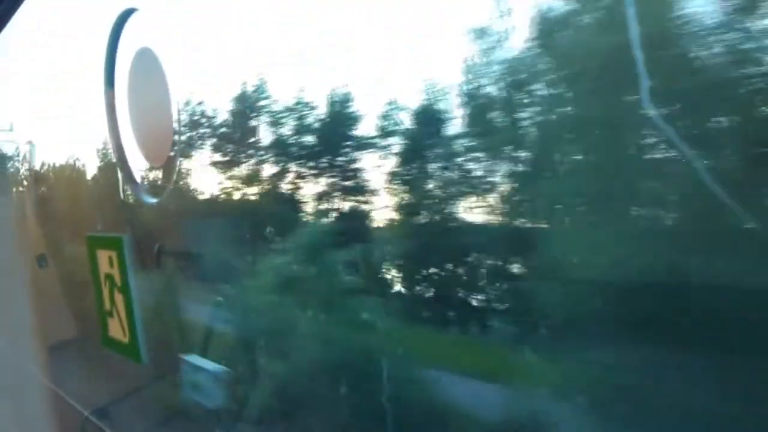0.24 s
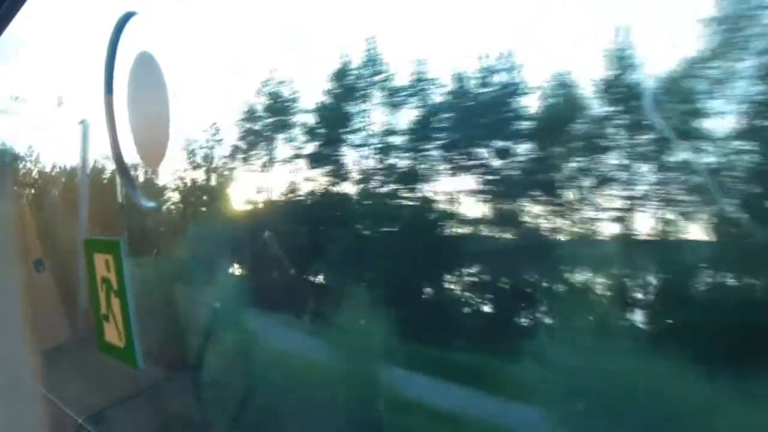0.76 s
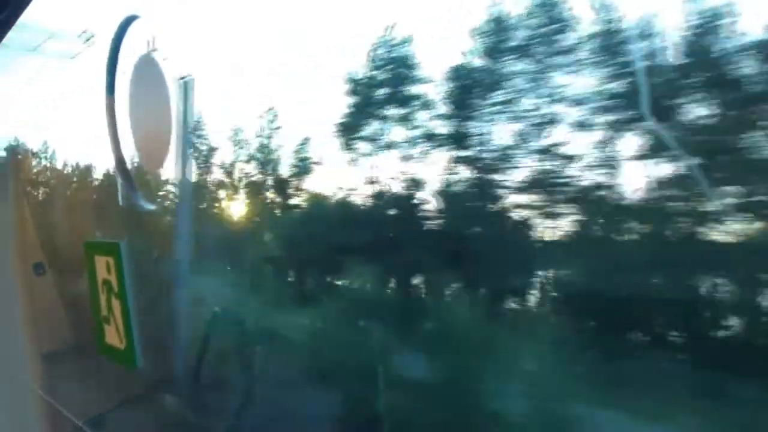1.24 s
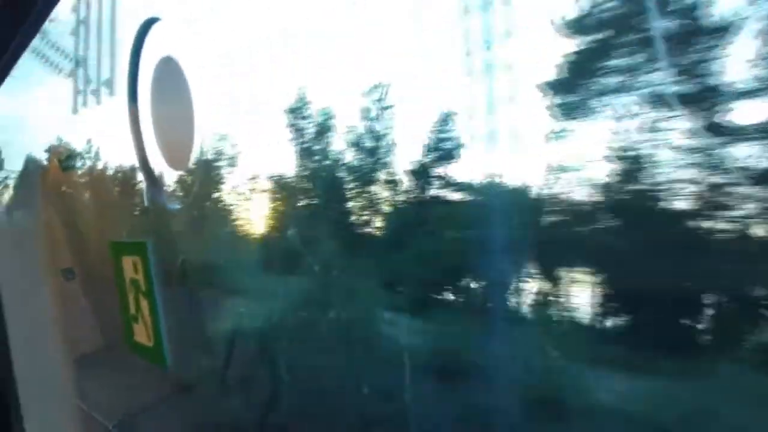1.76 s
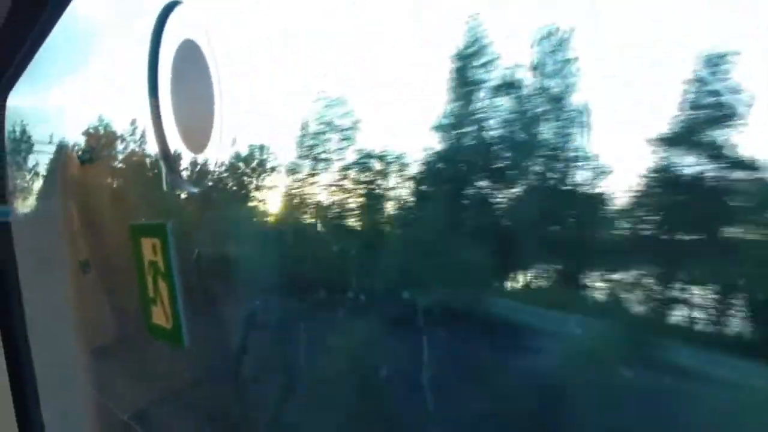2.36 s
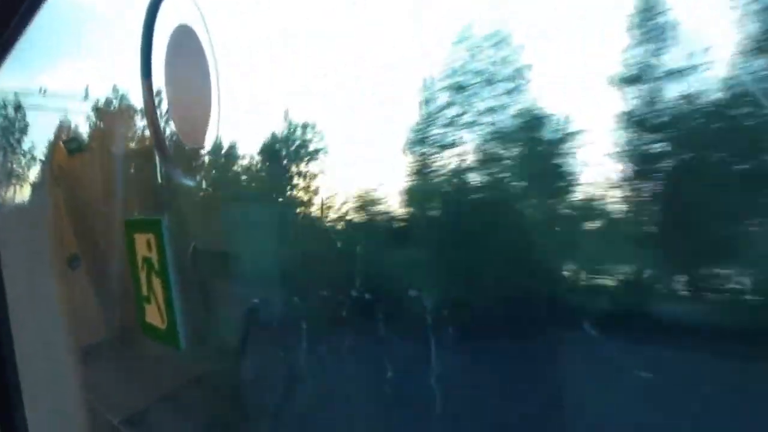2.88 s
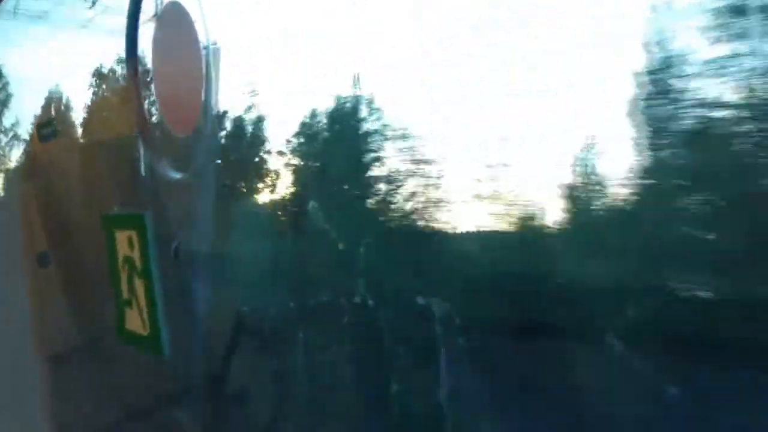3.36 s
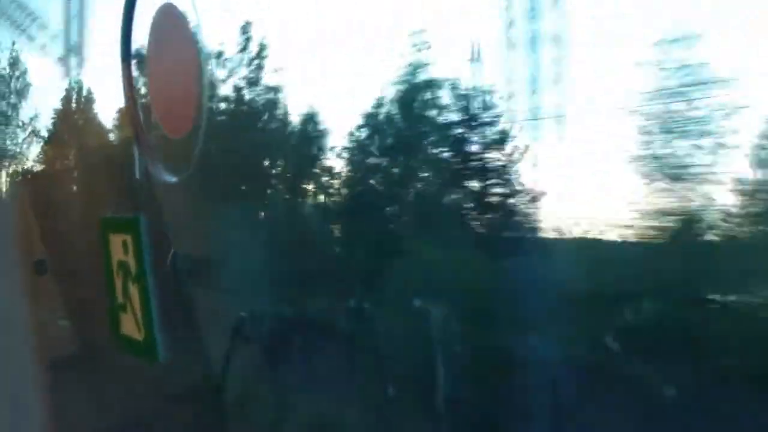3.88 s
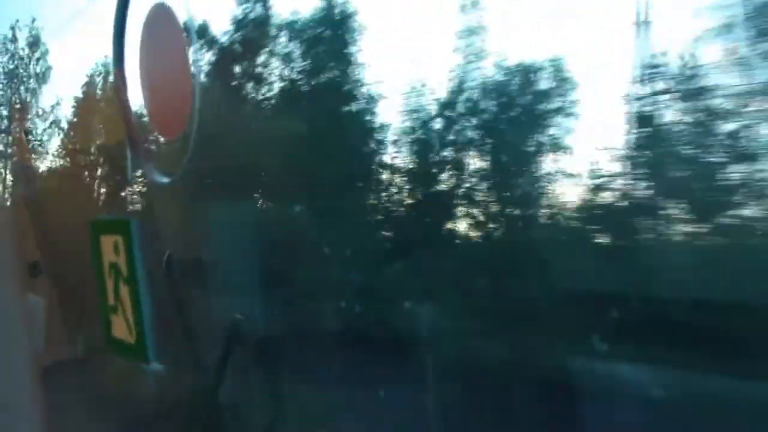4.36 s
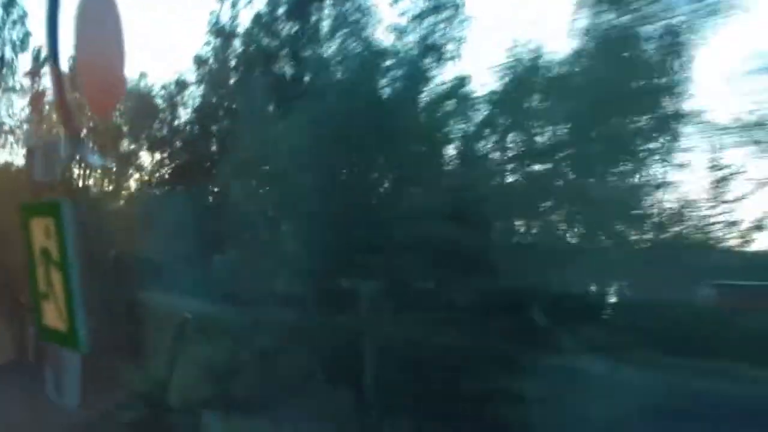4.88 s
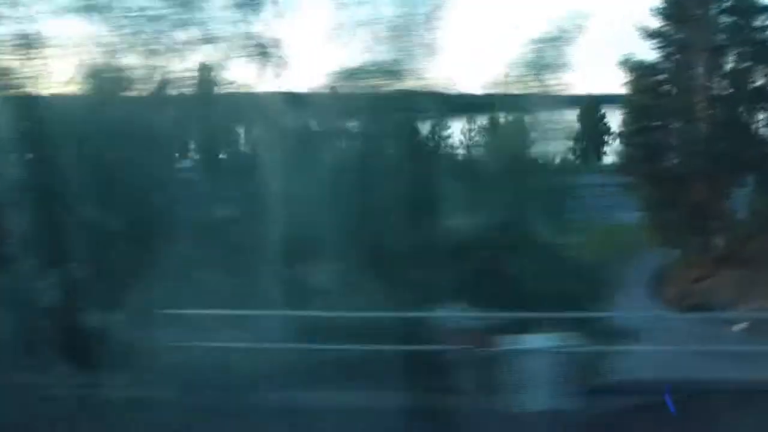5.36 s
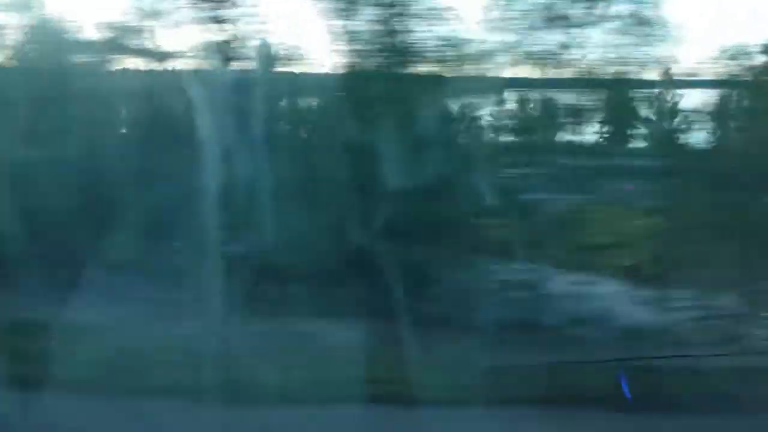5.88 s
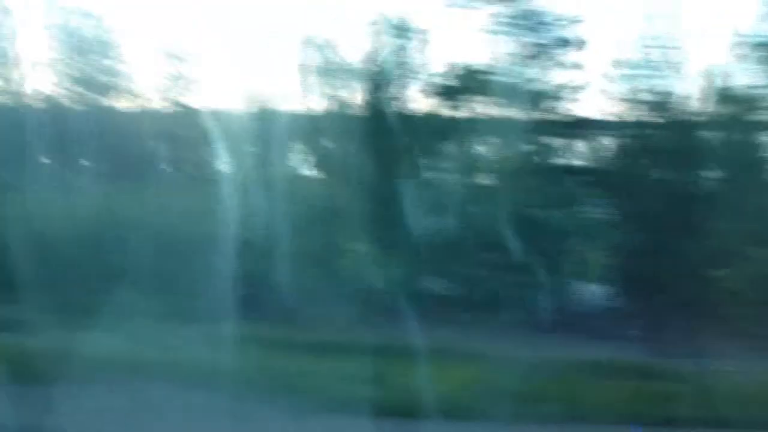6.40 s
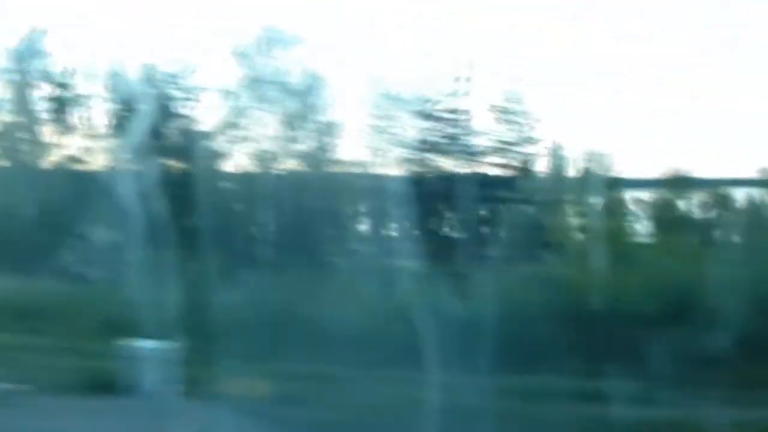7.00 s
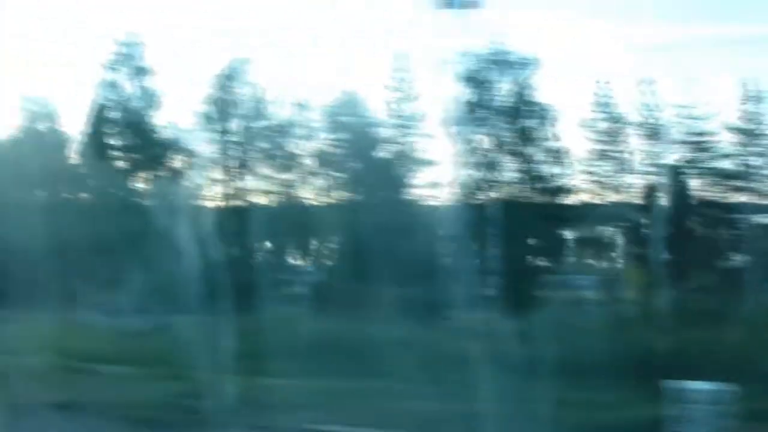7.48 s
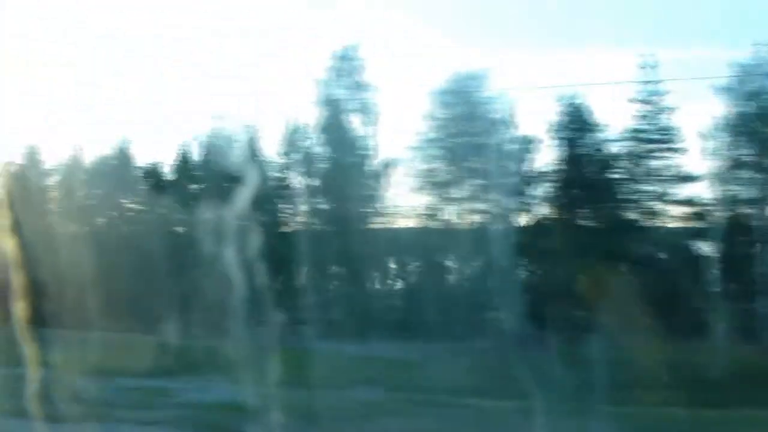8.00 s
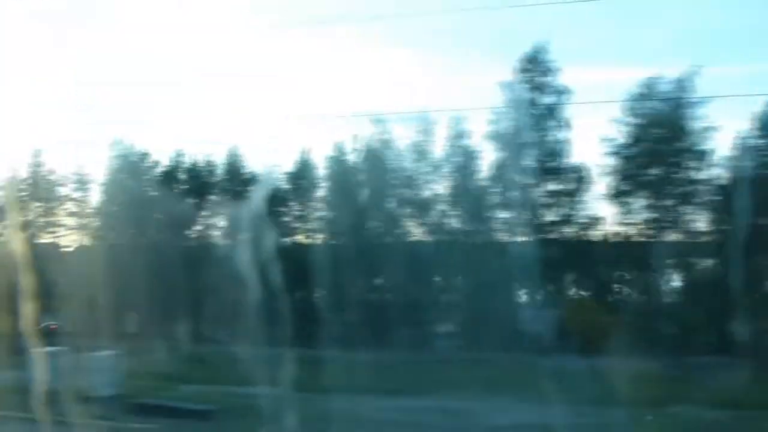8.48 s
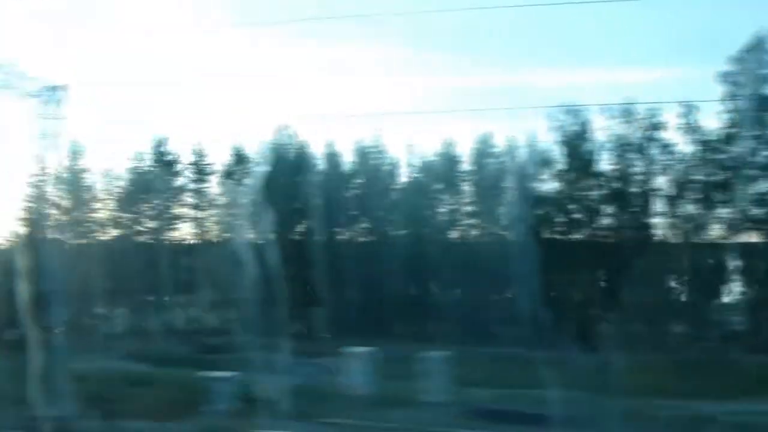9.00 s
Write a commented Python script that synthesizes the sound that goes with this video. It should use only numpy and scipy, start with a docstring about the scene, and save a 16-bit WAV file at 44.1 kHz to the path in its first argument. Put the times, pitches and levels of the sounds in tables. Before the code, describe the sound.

A train carriage rumbles steadily with faint wheel singing and small handling clicks, cutting out briefly and returning as a louder rush.

```python
"""Inside a moving train carriage, at the window: wheels rumble and knock on the rails, panels drone
and air hisses along the glass. On the first stretch the wheels sing on and off and a gap in the
window seal whistles. After about a fifth of a second of silence the ride goes on, louder and rushing,
at another window. Now and then fingers brush a hand-held camera, and its casing clicks and creaks."""
import sys
import numpy as np
from scipy import signal
from scipy.fft import rfft, irfft, next_fast_len
from scipy.io import wavfile
from scipy.ndimage import map_coordinates

SR = 44100
rng = np.random.default_rng(int(sys.argv[2]) if len(sys.argv) > 2 else 0)


def to_wav(s):
    """Save 16-bit WAV."""
    ch = np.atleast_2d(s).T  # columns
    pcm = np.round(np.clip(ch, -1, 1) * 32767)  # PCM
    wavfile.write(sys.argv[1], SR, pcm.astype(np.int16))


N = 407925
TIME = np.arange(N) / SR
HIGH_NOTE_HZ, LOW_NOTE_HZ = 851, 680  # the two notes the wheels sing


def rolling(levels_db, colour, likeness, judder_db, sway_db, boom_db=0, roll_db=0, roar_db=0):
    """Rough rails shake the floor and walls: a low boom, a middle roll and a higher roar."""
    # Rough patches of rail. Each row: middle and length in seconds, rise of roll and of roar in dB.
    patches = [(0.307, 0.067, 9, 2), (0.415, 0.085, 11, 5.5), (3.256, 0.031, 5, -1.5), (3.39, 0.2, 5.5, -1),
               (5.23, 0.066, 1.5, 4.5), (5.656, 0.14, 3, 1.2), (6.08, 0.14, 4, 0.5), (6.23, 0.1, 4, 0.5),
               (6.7, 0.13, 4, 1), (6.95, 0.16, 3, -0.5), (7.45, 0.4, 2, 0), (7.73, 0.13, 3.5, 0.2),
               (8.037, 0.14, 3, 2.5), (8.155, 0.069, 4, 2.5), (8.833, 0.21, 3, 0)]
    # Where the carriage body rings. Each row: pitch in Hz, width in Hz, boost in dB.
    body_modes = [(118.3, 2.9, 4.5), (231.4, 23, 4), (353, 56, 4), (470, 10, 4), (673.6, 6.9, 4),
                  (1100, 5.6, 4)]
    boom_level, roll_level, roar_level = levels_db
    roll_rise = sum(db * swell(s, length) for s, length, db, _ in patches) + sway_db * wobble(8)
    roar_rise = sum(db * swell(s, length) for s, length, _, db in patches)
    rumble = shaped_noise(colour, body_modes, likeness, ripple_db=3.0)
    low, middle, high = split_bands(rumble, 178.6, 580)
    boom = amp(boom_level + boom_db + 0.34 * roll_rise) * low  # follows a third of the roll's rise
    roll = amp(roll_level + roll_db + roll_rise) * middle
    roar = amp(roar_level + roar_db + roar_rise) * high
    judder = amp(judder_db * unit(wobble(24) + 1.5 * wobble(60)))
    return judder * (boom + roll + roar)


def wheel_knocks():
    """Each knock of a wheel rings the floor; a hard one reaches its higher notes, a soft one booms."""
    # Knocks on uneven rail. Each row: start in seconds, peak in dB, lowest and highest pitch in Hz.
    knocks = [(0.272, -41, 150, 600), (0.283, -31, 350, 900), (0.297, -30.5, 200, 650),
              (0.359, -34, 160, 330), (0.405, -26, 130, 450), (0.420, -27.5, 480, 800),
              (0.434, -23.5, 170, 420), (0.464, -24, 200, 422), (0.998, -32, 180, 600),
              (1.312, -28, 160, 400), (3.249, -28, 200, 427), (3.267, -28, 220, 480),
              (3.53, -28.5, 180, 378)]
    # The floor's notes. Each row: pitch in Hz, level in dB, seconds to fade by 60 dB.
    floor_modes = [(123, -3.5, 0.068), (249.4, 0, 0.034), (329.5, -1.5, 0.073), (440, -9.5, 0.093),
                   (578, 0.5, 0.028), (646, -2, 0.037), (796, -5, 0.0434)]
    out, t = np.zeros(N + SR), np.arange(SR // 4) / SR
    attack = 1 - np.exp(-t / 0.0018)  # the springs soften each knock
    for start, peak_db, low_hz, high_hz in knocks:
        ring = sum(amp(db + rng.normal(0, 0.63) - 60 * t / fade_s) * np.sin(2 * np.pi * hz * t)
                   for hz, db, fade_s in floor_modes)
        knock = band_pass(ring * attack, low_hz, high_hz)
        out[round(start * SR):][:len(t)] += amp(peak_db) * knock / np.abs(knock).max()
    return out[:N]


def surging_drone():
    """The rolling makes the panels hum one low note, which surges at uneven times."""
    # Surges of the hum. Each row: middle in seconds, length in seconds, level in dB.
    surges = [(0.39, 0.25, -50), (0.75, 0.1, -40), (1.178, 0.23, -42), (1.326, 0.12, -44.5),
              (1.89, 0.089, -41.5), (2.103, 0.25, -45), (2.62, 0.088, -37), (2.91, 0.11, -42),
              (3.58, 0.12, -37), (3.81, 0.1, -42), (4.162, 0.035, -36)]
    strength = amp(-51) + sum(amp(db) * swell(s, length) for s, length, db in surges)
    return strength * wavering_tone(hz=262.0, wander_hz=7.2, flutter_db=2.0)


def throbbing_drone(period_s=0.2405, peak_s=7.0, depth=0.38):
    """The panels' low hum pulses evenly, about four times a second."""
    pulse = 1 + depth * np.cos(2 * np.pi * (TIME - peak_s) / period_s)
    return amp(-48.5) * pulse * wavering_tone(hz=254.4, wander_hz=4.4, flutter_db=-2.0)


def singing_wheels():
    """The rolling rubs the wheels into two faint notes that flare up now and then."""
    # Flares of song. Each row: middle in seconds, length in seconds, level in dB, note in Hz.
    flares = [(0.42, 0.23, -50, HIGH_NOTE_HZ), (0.96, 0.1, -52, HIGH_NOTE_HZ),
              (1.187, 0.14, -50, HIGH_NOTE_HZ), (1.4, .14, -57, HIGH_NOTE_HZ),
              (1.69, 0.072, -49, HIGH_NOTE_HZ), (1.877, 0.15, -46, HIGH_NOTE_HZ),
              (2.763, .2, -49, HIGH_NOTE_HZ), (2.852, .3, -60, LOW_NOTE_HZ),
              (3.08, 0.25, -55, HIGH_NOTE_HZ), (3.66, 0.24, -53, LOW_NOTE_HZ),
              (3.8, 0.17, -45, HIGH_NOTE_HZ), (4.023, 0.11, -51, HIGH_NOTE_HZ),
              (4.457, 0.1, -50, LOW_NOTE_HZ), (4.77, 0.12, -48, LOW_NOTE_HZ),
              (5.038, 0.091, -46, HIGH_NOTE_HZ), (5.187, 0.12, -46.5, HIGH_NOTE_HZ)]

    def flaring(note_hz):
        return sum(amp(db) * swell(s, length) for s, length, db, hz in flares if hz == note_hz)
    joined = .5 + .5 * np.tanh(20 * (TIME - 2.8))  # the steady low note fades in at 2.8 seconds
    high_strength = amp(-58.5) + flaring(HIGH_NOTE_HZ)
    low_strength = amp(-57.5) * joined + flaring(LOW_NOTE_HZ)
    high = high_strength * wavering_tone(HIGH_NOTE_HZ, wander_hz=6.5, flutter_db=2.0)
    low = low_strength * wavering_tone(LOW_NOTE_HZ, wander_hz=4.2, flutter_db=-1.5)
    return high + low


def window_air(hiss_db, sizzle_db, colour, likeness, flutter_db):
    """Air streams along the window and rings its frame; its strength flutters a little."""
    # Where the window frame rings. Each row: pitch in Hz, width in Hz, boost in dB.
    frame_modes = [(1742, 39, 6), (1945, 76, 4), (4675, 86, 4), (7420, 60, 1), (7480, 82, 2.5),
                   (7700, 20, 1.5), (8230, 45, 2.5), (8540, 78, 5.5), (10520, 90, 1.5)]
    hiss, sizzle = split_bands(shaped_noise(colour, frame_modes, likeness, ripple_db=2.5), 8500)
    return amp(flutter_db * wobble(11)) * (amp(hiss_db) * hiss + amp(sizzle_db) * sizzle)


def casing_clicks(crack_db=-8, crack_fade_s=0.016, rub_db=-39.5, rub_fade_s=0.047):
    """The casing sticks and slips in the hand: a crack, a ring damped by the grip, then a faint rub."""
    # Slips. Each row: start in seconds, peak in dB, lowest and highest pitch in Hz,
    # left minus right in dB, factor on the ring time (small for a tight grip).
    slips = [(1.4205, -23, 1300, 15000, -2, 1.1), (1.4261, -23, 1300, 3220, -2, 1.3),
             (1.44, -29, 1500, 9000, -3, 1.1), (1.783, -24, 1200, 14000, -2, 0.89),
             (1.806, -34, 1500, 9000, 0, 1), (1.826, -28, 5000, 15000, 1, 1.2),
             (1.833, -31, 2000, 13000, 0, 1.2), (1.843, -26, 1400, 5000, -6, 1.4),
             (1.8667, -10, 1600, 5000, -3, .45), (2.949, -28, 1500, 8000, 0, 1.1),
             (3.002, -23, 1900, 4990, -6, 0.74), (3.08, -23.5, 1500, 6070, -9, 1.2),
             (3.0891, -1.3, 950, 15000, -5, .9), (3.1226, -16, 4000, 9000, -3, 1.3),
             (3.130, -35.5, 3030, 9560, 0, 1), (4.616, -31, 3500, 15000, 6, 1),
             (7.012, -24.5, 5200, 8000, 2, 1.3), (7.982, -30, 1100, 2400, -2, 1.4)]
    # The casing's notes. Each row: pitch in Hz, level in dB, seconds to fade by 60 dB.
    casing_modes = [(1340, -6, 0.005), (1860, 1, .008), (2320, -.5, 0.0036), (3450, 2, 0.0034),
                    (4600, -5, 0.0044), (6140, -13.5, 0.0079), (6480, 0.5, 0.0083), (9400, -7, .003),
                    (13300, -3, .004)]
    # Tone colour of the creak. Each row: pitch in Hz, level in dB.
    creak_colour = [(600, -24), (950, -2), (1300, 2), (2100, 1.5), (2800, -1), (3600, 1), (5500, -6),
                    (7500, -20), (15000, -30)]
    out, t = np.zeros((2, N + SR)), np.arange(SR // 8) / SR
    for start, peak_db, low_hz, high_hz, pan_db, looseness in slips:
        ring = 0
        for k, (hz, db, fade_s) in enumerate(casing_modes):
            fade = amp(db + rng.normal(0, 1) - 60 * t / (looseness * fade_s))
            gripped_hz = hz * (1 + .015 * rng.normal())  # the grip retunes each note a little
            ring += (-1) ** k * fade * np.sin(2 * np.pi * gripped_hz * t)  # neighbours swing opposite
        crack = amp(crack_db - 60 * t / (looseness * crack_fade_s))
        rub = amp(rub_db - 60 * t / rub_fade_s)
        scrape = (crack + rub) * rng.standard_normal((2, len(t)))
        click = band_pass(ring + scrape, low_hz, high_hz)  # soft slips lack treble, glancing ones body
        gains = amp(peak_db + np.array([[.5], [-.5]]) * pan_db)
        out[:, round(start * SR):][:, :len(t)] += gains * click / np.abs(click).max()
    strain = unit(shaped_noise(creak_colour, [], likeness=[(1000, .8)], ripple_db=0))
    creak = amp(-22.7) * swell(3.087, .0052) * strain  # just before the hardest snap

    def bend(hz):  # the shell bends, so high notes push left and right in opposite directions
        return np.exp(np.outer([-1j, 1j], np.arctan((hz / 1750) ** 2)))
    return filtered(out[:, :N] + creak, bend)


def finger_brushes():
    """Fingers slide on the casing: each stroke is a grainy swell of rasp with a fine swish on top."""
    # Finger strokes. Each row: middle and length in seconds, rasp level and swish level in dB.
    strokes = [(0.72, 0.1, -52.5, -59), (0.793, 0.08, -62, -64), (0.944, 0.11, -52, -74),
               (1.797, 0.097, -53, -68), (1.843, 0.04, -46, -51), (3.75, 0.18, -50, -67),
               (4.458, 0.056, -51.5, -79), (4.678, 0.21, -54.5, -78), (6.098, 0.2, -54, -51),
               (7.71, 0.15, -55, -54), (8.005, 0.32, -50.5, -47.5), (9.2, 0.26, -52, -53)]
    # Tone colours of the rasp and the swish. Each row: pitch in Hz, level in dB.
    rasp_colour = [(900, -22), (1600, 2), (2700, 4), (4000, 0), (6500, -3.5), (10000, -29), (15800, -24)]
    swish_colour = [(3000, -7), (7000, 4), (10000, 1), (13000, -5), (15800, -4)]
    rasp = unit(shaped_noise(rasp_colour, [], likeness=[(1000, .38)], ripple_db=1.5))
    swish = unit(shaped_noise(swish_colour, [], likeness=[(1000, .38)], ripple_db=1.5))
    brushing = sum(swell(s, length) * (amp(rasp_db) * rasp + amp(swish_db) * swish)
                   for s, length, rasp_db, swish_db in strokes)
    grain = amp(1.3 * wobble(150))
    return brushing * grain


def seal_whistle():
    """Air slips through a gap in the window seal and makes a thin band of hiss."""
    hiss = filtered(rng.standard_normal((2, N)), lambda hz: resonance(hz, centre_hz=4650, width_hz=85))
    return amp(-68) * unit(hiss)


def shaped_noise(colour, modes, likeness, ripple_db):
    """Stereo noise with a broad tone colour, narrow ringing peaks and a ripple of standing waves."""
    def response(hz):
        boost_db = sum(db * resonance(hz, centre, width) for centre, width, db in modes)
        ripple = np.array([map_coordinates(row, [hz / 20]) for row in rng.standard_normal((2, 2048))])
        ripple = ripple_db * ripple * hz / (hz + 1000)  # the bass stays even
        spread = np.arccos(np.clip(along(likeness, hz), -1, 1)) / 2
        return amp(along(colour, hz) + boost_db + ripple) * np.array([np.cos(spread), np.sin(spread)])
    mid, side = filtered(rng.standard_normal((2, N)), response)
    return np.array([mid + side, mid - side])


def wavering_tone(hz, wander_hz, flutter_db):
    """A tone of average strength 1 whose pitch and level drift at random."""
    phase = 2 * np.pi * np.cumsum(hz + wander_hz * wobble(35)) / SR
    return unit(amp(flutter_db * wobble(28)) * np.sin(phase))


def split_bands(x, *edges_hz):
    """Split a stereo sound into bands, low to high, each with strength 1 at its stereo centre."""
    below = [filtered(x, lambda hz: 1 / (1 + (hz / edge) ** 10)) for edge in edges_hz]
    return [band / np.std(band.mean(0)) for band in np.diff([0 * x, *below, x], axis=0)]


def filtered(x, response):
    """Scale each frequency of a sound by response(hz)."""
    size = next_fast_len(N + 8192)
    return irfft(rfft(x, size) * response(np.fft.rfftfreq(size, 1 / SR)), size)[..., :N]


def band_pass(x, low_hz, high_hz):
    """Keep mainly what lies between two pitches."""
    return signal.sosfilt(signal.butter(2, [low_hz, high_hz], "band", fs=SR, output="sos"), x)


def resonance(hz, centre_hz, width_hz):
    """A peak of height 1 around one pitch."""
    return 1 / (1 + (2 * (hz - centre_hz) / width_hz) ** 2)


def swell(middle_s, length_s):
    """A bell-shaped rise and fall, length_s wide at half height."""
    return .5 ** np.minimum((2 * (TIME - middle_s) / length_s) ** 2, 60)


def wobble(rate):
    """A smooth curve through `rate` random values a second."""
    return map_coordinates(rng.standard_normal(2048), [TIME * rate], mode="wrap")


def curves(rows):
    """Join timed rows with straight lines: one curve for each column after the time."""
    seconds, *columns = np.transpose(rows)
    return [np.interp(TIME, seconds, column) for column in columns]


def along(points, hz):
    """Read between (Hz, value) points on a logarithmic pitch scale."""
    pitches, values = np.transpose(points)
    return np.interp(np.log(hz + 1), np.log(pitches + 1), values)


def amp(db):
    """Turn decibels into a gain."""
    return 10 ** (np.asarray(db) / 20)


def unit(x):
    """Scale to an average strength (rms) of 1."""
    return x / np.sqrt(np.mean(x ** 2) + 1e-20)


def first_stretch():
    """Rumble and air rise and fall while the panels surge, the wheels sing and the seal whistles."""
    # Strength of the rumble. Each row: time in seconds, base levels of boom, roll and roar in dB.
    rumble_levels = [(0.02, -47, -44, -50.5), (0.12, -54, -38.5, -49), (0.25, -51.5, -41.5, -46),
                     (0.6, -43.5, -39.5, -46), (0.85, -49.5, -39.5, -48.1), (1.0, -54.5, -42, -43),
                     (1.3, -51, -37.5, -44.5), (1.5, -50.5, -37, -44), (1.9, -46.5, -37.5, -42.5),
                     (2.06, -47, -43.5, -51), (2.4, -46.5, -40, -46.5), (2.85, -48.2, -40, -45),
                     (3.15, -44.5, -38, -45), (3.6, -48, -39, -46), (3.8, -46.5, -38.5, -45.5),
                     (4.05, -44, -41, -48.5), (4.55, -50.5, -43, -48), (4.8, -48.5, -42, -46.5),
                     (5.28, -46.5, -38.5, -46.5)]
    # Strength of the air. Each row: time in seconds, base levels of hiss and sizzle in dB.
    air_levels = [(0.02, -61, -70), (0.1, -56.5, -67), (0.35, -52.5, -63), (0.85, -58, -67),
                  (1.2, -52, -63), (1.95, -53.5, -63.5), (2.03, -60.5, -68.5), (2.13, -55.5, -62.5),
                  (2.6, -53.5, -60.5), (3.3, -53, -61), (3.42, -56, -71), (3.62, -56, -67.5),
                  (4.0, -55, -63.8), (4.3, -56.5, -66.5), (4.85, -57.5, -64.5), (5.02, -52.5, -64.5),
                  (5.13, -53, -62), (5.26, -52.5, -64)]
    # Tone colours of the rumble and the air. Each row: pitch in Hz, level in dB.
    rumble_colour = [(25, -40), (55, -29.5), (80, -12.5), (112, -3), (138, -11), (160, -4), (200, -4.5),
                     (280, -2), (370, -5.5), (520, -9), (780, -13), (1100, -19), (1500, -29.5),
                     (2500, -39.5), (6000, -100)]
    air_colour = [(600, -8), (1400, 2), (1800, 0), (2300, 5), (2900, 2.5), (4000, 1), (4800, 1),
                  (6300, -2.5), (7500, -2), (8600, -5), (10500, -10.5), (13000, -17), (15800, -22.5)]
    # How alike left and right sound. Each row: pitch in Hz, likeness (1 means the same).
    likeness = [(30, 0.91), (70, 0.99), (250, 1), (500, 0.99), (900, 0.94), (1200, 0.66), (1500, .2),
                (2100, 0.67), (3000, 0.32), (4100, -0.014), (7500, .3), (12000, -.1)]
    # Brief dips in the ride's level. Each row: middle in seconds, length in seconds, depth in dB.
    lulls = [(3.678, 0.077, 3.5), (4.39, 0.042, 5.5)]
    ride = rolling(curves(rumble_levels), rumble_colour, likeness, judder_db=0.66, sway_db=0.85,
                   boom_db=-1.84, roll_db=-0.5, roar_db=-1.7)
    ride += surging_drone() + singing_wheels()
    ride += window_air(*curves(air_levels), air_colour, likeness, flutter_db=1.0) + seal_whistle()
    return ride * amp(-sum(db * swell(s, length) for s, length, db in lulls))


def second_stretch():
    """At another window the rumble and air are louder and steadier, and the panels throb."""
    # Tone colours of the rumble and the air. Each row: pitch in Hz, level in dB.
    rumble_colour = [(25, -54), (58, -34), (80, -17.5), (115, -9), (140, -12.5), (195, -3), (235, 1),
                     (300, 0), (480, 0), (700, -5.5), (950, -9), (1250, -18), (2000, -29), (6000, -100)]
    air_colour = [(600, -6), (1350, -1), (1750, 4.5), (2050, 9), (2550, 3.5), (4000, 2), (5600, 2),
                  (6600, -2.5), (7100, 3), (8900, 1.5), (10300, -2), (13000, -7.5), (15800, -12.5)]
    # How alike left and right sound. Each row: pitch in Hz, likeness (1 means the same).
    likeness = [(30, 0.54), (70, 0.99), (220, .999), (500, 0.99), (900, 0.91), (1250, 0.18), (2000, 0.71),
                (2850, -0.051), (3900, 0.14), (4700, 0.032), (5600, 0.37), (9000, 0.074), (11000, -0.11)]
    levels_db = (-53, -38.5, -41.5)  # boom, roll, roar
    rumble = rolling(levels_db, rumble_colour, likeness, judder_db=0.5, sway_db=0.7)
    drone = throbbing_drone()
    air = window_air(hiss_db=-48, sizzle_db=-58.5, colour=air_colour, likeness=likeness, flutter_db=0.4)
    return rumble + drone + air


def scene():
    """Two stretches of the ride, with silence between them."""
    # The ride's treble leans to the left. Each row: pitch in Hz, left minus right in dB.
    balance = [(200, 0), (700, .6), (1200, 2), (2000, 1.2), (5000, 1.8), (8000, 1.2), (12000, .4)]
    first_ends_s, second_starts_s = 5.293, 5.521
    ride = np.where(TIME < first_ends_s, first_stretch(), second_stretch())
    ride = filtered(ride, lambda hz: amp(np.outer([.5, -.5], along(balance, hz))))
    sounding = (TIME < first_ends_s) | (TIME > second_starts_s)
    return (ride + casing_clicks() + finger_brushes() + wheel_knocks()) * sounding


def record(dry):
    """Cut away the very highest treble."""
    top_hz, fade_width_hz = 15850, 200
    return filtered(dry, lambda hz: np.clip((top_hz - hz) / fade_width_hz + .5, 0, 1))


dry = scene()
out = record(dry)
to_wav(out)
```